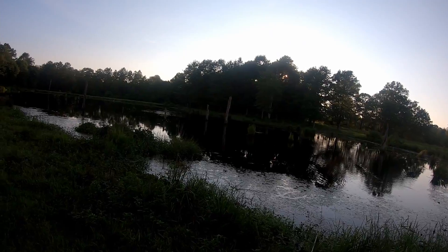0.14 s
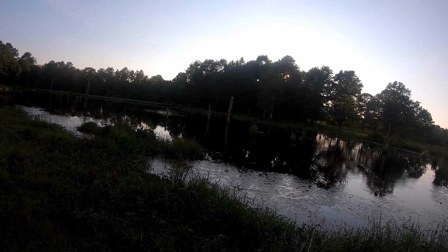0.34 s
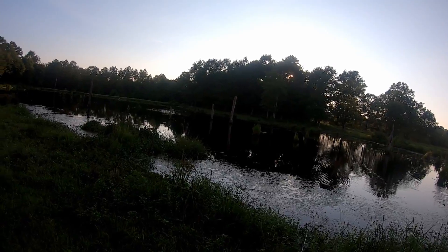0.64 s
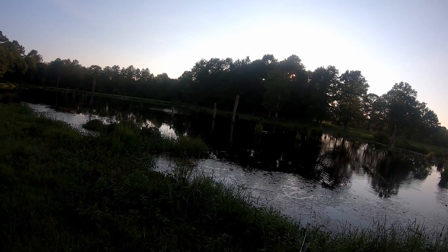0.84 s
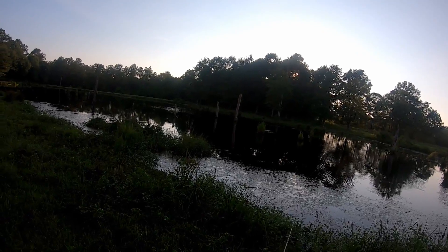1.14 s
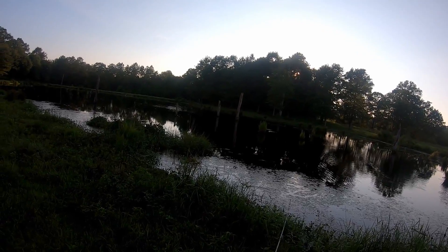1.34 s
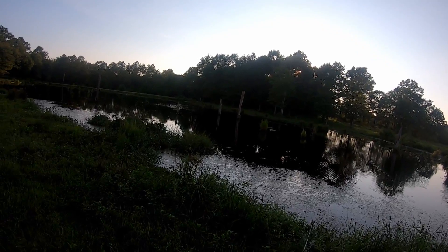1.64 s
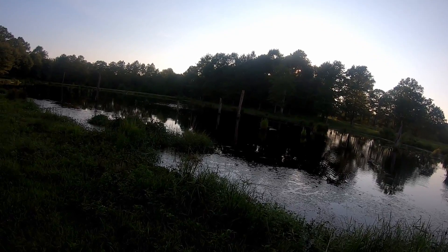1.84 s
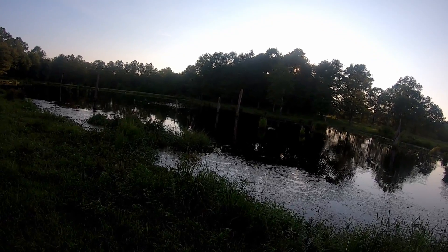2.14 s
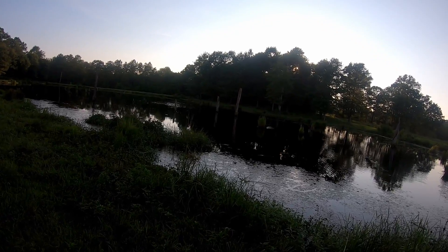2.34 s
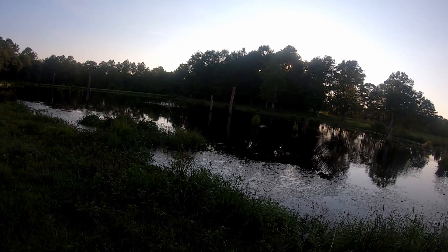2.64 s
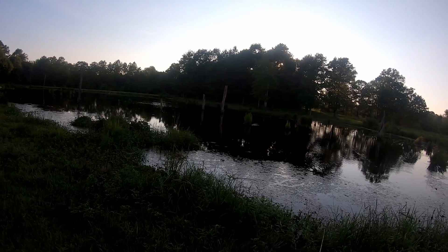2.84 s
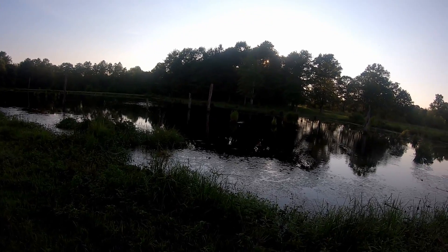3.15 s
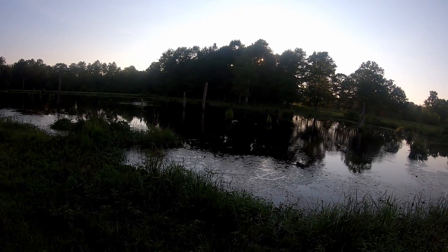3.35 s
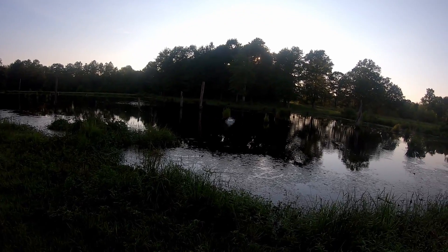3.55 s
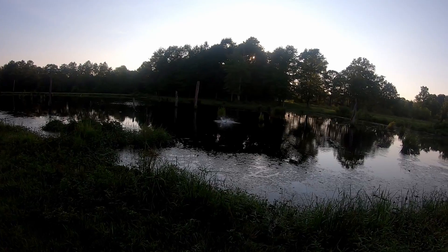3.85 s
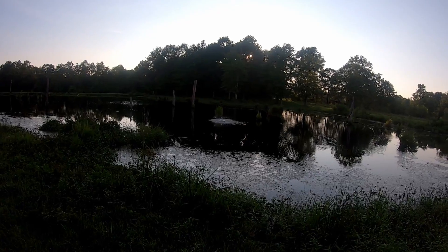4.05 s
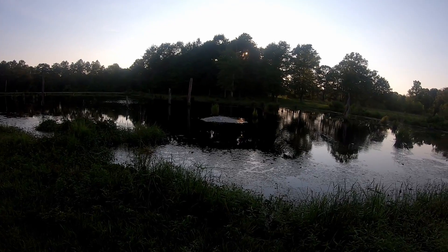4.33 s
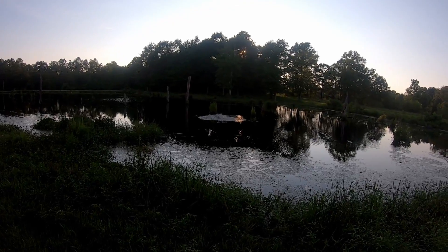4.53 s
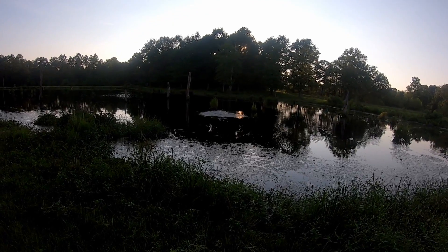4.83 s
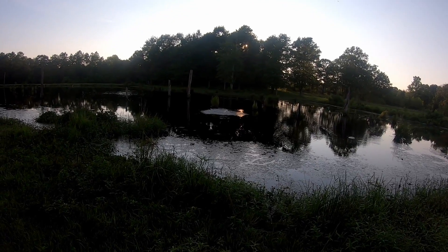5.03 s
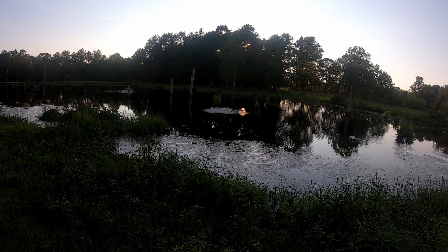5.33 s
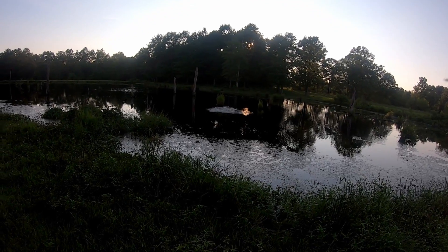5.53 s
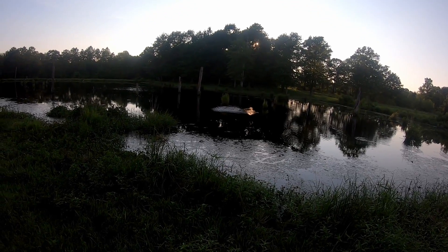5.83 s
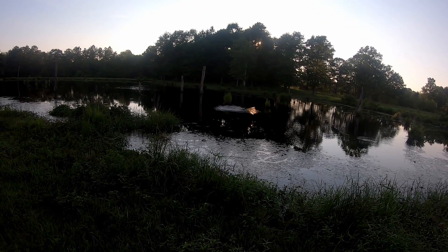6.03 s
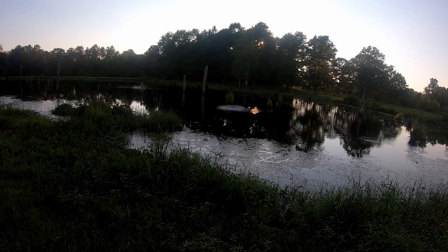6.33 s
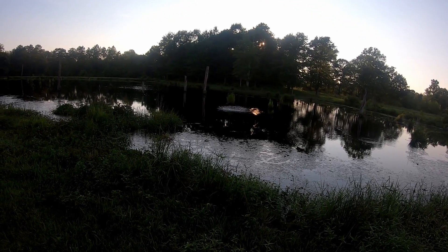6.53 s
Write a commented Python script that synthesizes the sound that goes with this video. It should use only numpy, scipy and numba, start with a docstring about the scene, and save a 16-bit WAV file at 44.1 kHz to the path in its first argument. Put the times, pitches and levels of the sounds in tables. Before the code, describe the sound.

A fishing reel clicks and winds with an uneven, raspy whir after nearby rod knocks and rustling, over soft insects, water and distant birds.

```python
"""Dusk at a pond, a two-port stereo microphone beside an angler. From the start: crickets, buzzing
insects, small splashes at the bank and a low distant hum; far birds whistle and far frogs call.
A few snaps come from the reel. At 3 s, close up, the angler shifts the rod and snaps the reel shut:
hands thump, cloth rustles, a sleeve swishes, the rod knocks, while a deeper hum swells in. From about
4 s the angler winds in, the line rubbing by the right port, and for a while the rotor ticks."""
import sys
import numpy as np
from scipy import signal
from scipy.io import wavfile
from numba import njit

SR = 44100
rng = np.random.default_rng(int(sys.argv[2]) if len(sys.argv) > 2 else 0)


def generate_wav(signal):
    """Clip the signal to [-1, 1] and save it as 16-bit WAV at the path in sys.argv[1]."""
    frames = np.transpose(np.atleast_2d(signal))
    scaled = np.clip(frames, -1, 1) * 32767
    pcm = np.round(scaled).astype(np.int16)
    wavfile.write(sys.argv[1], SR, pcm)


N = 294588

# how alike the two ports hear broad noise: f/Hz, correlation
PORT_LIKENESS = [(60, 1), (170, 0.9), (400, 0.58), (700, 0.36), (1400, 0.17), (3000, 0.53), (5000, 0.37),
                 (7000, -0.76), (9500, 0.056), (12500, 0.12)]
# far air: f/Hz, relative density/dB
AIR_SPECTRUM = [(230, -7), (340, 0.5), (560, -36), (830, -3.5), (1300, -0.5), (1850, -5), (2850, -7.5),
                (4840, -9), (6500, 0), (7500, -32)]
# distant hum: f/Hz, width/Hz, relative level/dB
HUM_MODES = [(143, 45, -2.5), (172.7, 24.6, 1.5), (224.3, 24.7, -4)]
# insects round the pond: t/s, crickets/dB, buzz/dB, high hiss/dB
INSECT_LEVELS = [(0, -59, -62.5, -58.5), (1.0, -59.5, -60, -57), (2.98, -60, -59.5, -57),
                 (3.18, -60, -65, -58), (3.9, -58, -65, -58.5), (4.4, -61, -66, -64),
                 (5.1, -57.5, -63, -59.5), (5.88, -59.5, -65, -61.5), (6.25, -59, -62, -58),
                 (6.68, -58.5, -64, -59)]
# bands of the crickets and of the buzz: f/Hz, width/Hz, relative level/dB
CRICKET_MODES = [(6913, 210, 1.5), (7260, 450, 0.5)]
BUZZ_MODES = [(9860, 490, 2), (10820, 730, 1.5), (11000, 300, -6.5)]
# high insect hiss: f/Hz, relative density/dB
HISS_SPECTRUM = [(6700, -34), (7700, 7), (8300, 8.5), (9000, -4), (11500, -1.5), (12600, -15.5), (13500, 0),
                 (14200, -4), (15000, -10), (17000, -19)]
# water at the bank: t/s, level/dB
BANK_LEVELS = [(0, -57.5), (.4, -62), (.8, -61), (1.5, -63), (1.9, -59.5), (2.74, -61.5), (2.79, -88),
               (2.97, -62), (3.1, -55.5), (6.68, -58.5)]
# lapping under the bubbles: f/Hz, relative density/dB
WASH_SPECTRUM = [(600, -7), (1000, 1), (1900, 0.5), (2600, -1.5), (3600, -8), (5000, -19)]
# the clearest drips: t/s, starting f/Hz, level/dB
CLEAR_DRIPS = [(0.189, 754, -63), (1.129, 696, -56.5), (1.201, 815, -62), (1.4, 760, -55),
               (1.469, 650, -68), (1.685, 694, -54), (1.749, 890, -65), (1.901, 827, -57),
               (1.941, 3170, -59), (1.99, 2160, -54), (2.099, 726, -53), (2.167, 760, -53.5),
               (2.22, 3140, -58), (2.32, 1265, -53.5), (2.45, 677, -57), (2.5, 2700, -55),
               (2.54, 623, -53.5)]
# two far birds, one falling whistle each: t/s into the call, f/Hz, relative level/dB
LOW_WHISTLE = [(0, 3440, -10), (.045, 3310, -2.5), (.068, 2950, -6), (.088, 2420, -6), (.11, 2270, -10)]
HIGH_WHISTLE = [(0, 7050, -12), (.025, 6250, 1.5), (.05, 5450, -4), (.08, 4900, -5), (.12, 4600, -14)]
# their calls: t/s, level/dB
LOW_BIRD_CALLS = [(0.016, -54), (0.656, -52.5), (.915, -51), (3.305, -57)]
HIGH_BIRD_CALLS = [(.18, -59), (1.867, -61), (5.144, -55.5), (6.519, -69)]
# short bird chips: t/s, length/s, first f/Hz, last f/Hz, level/dB
BIRD_CHIPS = [(4.663, 0.022, 3920, 3230, -43.5), (4.711, 0.027, 4250, 4520, -48),
              (5.71, .03, 3900, 4360, -53), (6.609, .04, 4200, 5000, -46.5)]
# far frogs: t/s, length/s, first f/Hz, last f/Hz, level/dB
FROG_CALLS = [(0.087, 0.06, 2000, 1980, -58.5), (.64, 0.061, 1850, 1910, -61),
              (0.96, 0.063, 1007, 1046, -65.5), (1.04, 0.13, 2850, 2740, -67),
              (1.226, 0.054, 2700, 2680, -64.5), (1.28, 0.12, 1056, 1007, -67),
              (1.55, 0.045, 1330, 1290, -64), (1.733, 0.03, 2520, 2100, -59),
              (1.906, 0.024, 2700, 2280, -58), (2.011, 0.031, 2470, 2040, -60),
              (2.18, 0.19, 1343, 1290, -66), (2.236, 0.035, 2370, 2200, -61), (2.257, .03, 2310, 2940, -64),
              (2.287, 0.024, 2570, 2080, -57), (2.433, 0.035, 2770, 2380, -64.5),
              (2.456, 0.05, 1400, 1304, -60), (2.523, 0.013, 2610, 2250, -57.5),
              (2.566, .025, 2770, 2150, -57), (2.588, 0.019, 2230, 2600, -57),
              (2.902, 0.032, 2570, 2280, -60)]
# hands on the casing, and cloth close by: peak t/s, 10 dB rise/s, 10 dB fall/s, level/dB
HAND_BUMPS = [(.15, .04, .04, -69), (.67, .05, .15, -71), (2.27, .08, .04, -76), (2.63, 0.12, 0.037, -67),
              (3.09, 0.045, 0.075, -46), (3.26, 0.11, 0.064, -47), (3.77, 0.19, 0.083, -52),
              (3.9, 0.072, 0.26, -56.5), (4.28, 0.16, 0.062, -57.5), (4.68, 0.09, .04, -53),
              (4.87, .06, 0.18, -58.5), (5.36, .08, 0.15, -52), (5.95, 0.12, 0.16, -56.5),
              (6.5, 0.13, .1, -67)]
CLOTH_RUSTLES = [(.48, 0.06, .1, -62.5), (.68, 0.084, 0.07, -56.5), (3.08, .06, 0.15, -49.5),
                 (3.225, 0.051, .05, -44.5), (3.272, .03, 0.05, -36), (3.385, .05, 0.044, -47.5),
                 (3.54, 0.067, 0.035, -45.5), (3.68, 0.15, 0.079, -42), (3.83, .06, 0.064, -50),
                 (3.98, 0.14, .2, -57.5), (4.17, 0.093, 0.073, -50.5), (4.3, 0.046, 0.073, -49.5),
                 (4.385, .05, 0.017, -50), (4.8, 0.16, .12, -62.5), (5.33, 0.099, 0.12, -61),
                 (5.55, 0.36, .15, -59.5), (6.5, .1, 0.042, -58), (6.68, 0.073, 0.067, -60.5)]
# cloth: f/Hz, relative density/dB
CLOTH_SPECTRUM = [(110, -12), (190, -6.5), (270, -2.5), (380, -2), (480, -1.5), (800, -2.5), (1400, -7),
                  (3000, -41), (5000, -25)]
# bright snaps of the reel: t/s, level/dB, ring f/Hz, t60/s, left over right/dB
REEL_SNAPS = [(0.234, -41, 7040, 0.11, 3), (0.5778, -33, 2280, 0.053, 3), (1.5096, -49, 7000, 0.052, -6),
              (2.569, -45, 2650, 0.089, -3), (2.5987, -46, 2210, 0.11, -5), (2.898, -49, 2290, 0.034, -1.5),
              (3.13, -35, 3440, 0.04, 0), (3.336, -49, 3340, 0.037, -1.5), (3.47, -34.5, 3600, 0.075, 15),
              (3.577, -39, 2980, 0.044, -1.0), (3.635, -36, 3220, 0.067, 2),
              (3.716, -43, 2350, 0.035, -0.5), (3.744, -42, 2550, 0.073, 1.0),
              (3.8313, -27.5, 6500, 0.014, -2), (3.9789, -32.5, 2510, 0.044, 3),
              (4.019, -34.5, 4300, 0.034, 1), (4.1516, -38.5, 2520, 0.029, 1), (5.197, -44, 4000, .03, 2),
              (5.443, -43, 3600, .03, 3)]
# the deeper hum: t/s, level/dB
DEEP_HUM_LEVELS = [(0, -91), (3.0, -75), (4.0, -67.5), (6.68, -64)]
# sleeve close by: peak t/s, 10 dB rise/s, 10 dB fall/s, level/dB
SLEEVE_SWISHES = [(3.08, 0.028, 0.055, -49), (3.134, 0.0075, .03, -44), (3.474, 0.004, 0.0076, -39),
                  (3.575, 0.034, .02, -45.5), (3.65, 0.063, 0.17, -41.5), (3.82, 0.02, 0.013, -42),
                  (3.935, 0.09, 0.031, -44), (4.02, 0.048, 0.095, -44)]
# sleeve: f/Hz, relative density/dB
SLEEVE_SPECTRUM = [(700, -9), (1200, 0.5), (2200, 0.5), (3500, -1), (5000, -9), (7000, -20)]
# dull knocks through rod and casing: t/s, level/dB, ring f/Hz, t60/s
ROD_KNOCKS = [(3.082, -40, 346, 0.047), (3.23, -33.5, 455, .04), (3.2675, -17.5, 815, 0.0062),
              (3.272, -28, 348, 0.058), (3.286, -30, 720, 0.018), (3.324, -36, 403, 0.041),
              (3.491, -24.5, 723, 0.018), (3.532, -35, 592, 0.021), (3.593, -32.5, 470, 0.047),
              (3.898, -40, 1000, 0.02), (4.151, -30, 990, 0.017), (4.369, -42, 222, 0.14),
              (6.515, -43.5, 460, 0.035)]
# winding strokes: top-speed t/s, 10 dB rise/s, 10 dB fall/s, level/dB, top-speed f/Hz
WINDING_STROKES = [(3.91, 0.044, 0.076, -44.5, 2250), (4.065, 0.047, 0.034, -44.5, 2400),
                   (4.21, 0.061, 0.12, -42, 2570), (4.31, 0.046, 0.088, -42.5, 2340),
                   (4.49, 0.075, 0.045, -43.5, 2350), (4.555, 0.089, 0.086, -48.5, 2700),
                   (4.62, 0.044, 0.055, -43, 1950), (4.71, 0.055, 0.067, -44, 2210),
                   (4.8, 0.1, 0.15, -45.5, 2320), (4.969, 0.039, 0.031, -42, 2260),
                   (5.055, 0.081, 0.077, -39.5, 3000), (5.26, 0.059, 0.072, -41.5, 2760),
                   (5.372, 0.027, 0.026, -39, 2970), (5.511, 0.054, 0.049, -43, 2810),
                   (5.58, 0.056, .1, -42, 2970), (5.79, 0.094, 0.052, -47.5, 1920),
                   (5.85, 0.046, 0.051, -44, 2600), (5.965, .025, 0.027, -40.5, 2520),
                   (6.101, 0.069, 0.11, -45, 2030), (6.2, 0.065, 0.078, -45, 2010),
                   (6.31, 0.048, 0.043, -48, 1920), (6.47, 0.074, 0.051, -50.5, 1850),
                   (6.575, 0.12, 0.094, -50, 2520), (6.67, 0.049, .05, -46.5, 2000)]
# lower and higher rings of reel and rod: f/Hz, width/Hz, relative level/dB
REEL_MODES = [(1504, 360, -8.5), (1723, 34, -1), (1763, 21, 4), (1984, 86, 6), (2266, 79, -1),
              (2450, 40, 7.5), (2540, 150, -1.5), (2720, 74, 4), (2930, 62, 4), (3230, 65, 4.5),
              (3700, 60, 1.5)]
BRIGHT_MODES = [(4050, 590, 0), (5180, 290, 4.5), (6500, 140, -18), (6190, 50, -6), (6420, 1260, 1),
                (8100, 440, 5.5), (9130, 1200, 4), (10020, 490, 6.5)]
# ticks of the rotor: t/s, level/dB
ROTOR_TICKS = [(4.2981, -51), (4.362, -42.5), (4.4273, -50), (4.4864, -50), (4.5545, -48), (4.6169, -49),
               (4.6753, -50), (4.7434, -51), (4.8044, -47), (4.8663, -48), (4.9344, -42), (5.0034, -46),
               (5.08, -46), (5.1482, -52), (5.2096, -47), (5.2764, -45), (5.3394, -51), (5.4051, -48),
               (5.4839, -47), (5.5653, -44), (5.6304, -48), (5.7029, -49), (5.8007, -48)]

BLOW_T = np.arange(int(.12 * SR)) / SR   # time axis of a snap, knock or tick, t/s
STEP = 40   # samples between points of a slow curve


def from_db(db):
    """Decibels to gain."""
    return 10 ** (np.asarray(db) / 20)


def rms_one(x):
    """Scale to rms 1."""
    return x / np.sqrt(np.mean(x ** 2) + 1e-20)


def butter(x, order, hz, kind):
    """Pass a low, high or middle band."""
    return signal.sosfilt(signal.butter(order, hz, kind, fs=SR, output="sos"), x)


def in_time(rows):
    """Every column joined by straight lines, one value a sample."""
    s, *columns = np.transpose(rows)
    return [np.interp(np.arange(N) / SR, s, c) for c in columns]


def at_hz(points, hz):
    """Read a spectrum on a log axis."""
    freqs, values = np.transpose(points)
    return np.interp(np.log(hz), np.log(freqs), values)


def every_sample(slow):
    """Fill in a slow curve."""
    return np.interp(np.arange(N) / STEP, np.arange(len(slow)), slow)


def drift(rate_hz):
    """Slow random wander of spread 1."""
    r = np.exp(-2 * np.pi * rate_hz * STEP / SR)
    slow = signal.lfilter([1], [1, -2 * r, r * r], rng.standard_normal(N // STEP + 2002))[2000:]
    return every_sample(rms_one(slow))


def fades(rows, roundness=0.93):
    """Slow curves of how many tens of dB each event lies under its peak."""
    s, rise, fall = np.transpose(rows)[:3, :, None]
    late = np.arange(0, N + STEP, STEP) / SR - s
    return np.abs(np.where(late < 0, late / rise, late / fall)) ** roundness


def swells(rows, still_db):
    """Gain of events that swell and fade over a still level; powers add."""
    gains = from_db(np.transpose(rows)[3, :, None] - 10 * fades(rows))
    return every_sample(np.sqrt(from_db(2 * still_db) + np.sum(gains ** 2, axis=0)))


def resonate(x, hz, width):
    """A resonance with gain 1 at its peak."""
    r = np.exp(-np.pi * width / SR)
    poles = [1, -2 * r * np.cos(2 * np.pi * hz / SR), r * r]
    return signal.lfilter(np.array([1, 0, -1]) * (1 - r * r) / 2, poles, x)


def modes(x, table):
    """Resonances side by side with alternating signs; rms 1."""
    rings = (from_db(db) * resonate(x, hz, width) for hz, width, db in table)
    return rms_one(sum((-1) ** k * ring for k, ring in enumerate(rings)))


@njit
def sliding(x, hz, width):
    """A resonance whose centre moves from sample to sample."""
    out, r = np.zeros_like(x), np.exp(-np.pi * width / SR)
    for i in range(2, len(x)):
        feedback = 2 * r * np.cos(2 * np.pi * hz[i] / SR) * out[i - 1] - r * r * out[i - 2]
        out[i] = x[i] - x[i - 2] + feedback
    return out


def noise():
    """Two unrelated stereo noises."""
    return rng.standard_normal((2, 2, N))


def banded(spectrum, white, flicker_db):
    """Third-octave bands of stereo noise, each with its own level, flicker and likeness; mid rms 1."""
    out, together = 0, drift(19.8)
    bottom, top = spectrum[0][0], spectrum[-1][0]
    edges = bottom * 2 ** np.arange(0, np.log2(top / bottom), 1 / 3)
    for k, (low, high) in enumerate(zip(edges, edges[1:])):
        mid, side = butter(white[k % 2], 2, [low, min(high, .45 * SR)], "band")
        hz = np.sqrt(low * high)
        alike = at_hz(PORT_LIKENESS, hz)
        gain = from_db(at_hz(spectrum, hz) + flicker_db * (0.94 * together + drift(16.7)))
        out = out + gain * (np.sqrt(1 + alike) * mid + np.sqrt(1 - alike) * side * [[1], [-1]])
    return out / np.sqrt(np.mean(out.mean(axis=0) ** 2))


def ports(mid, side, side_db):
    """Left and right port from mid and side."""
    return mid + from_db(side_db) * side * np.array([[1], [-1]])


def add(out, s, sound, pan_db):
    """Lay a short sound into the stereo track; positive pan is left."""
    i = round(s * SR)
    out[:, i:i + len(sound)] += sound[:N - i] * from_db([[pan_db / 2], [-pan_db / 2]])


def far_air():
    """Faint broad noise from far off, nearly steady."""
    return from_db(-67) * banded(AIR_SPECTRUM, noise(), flicker_db=0.54)


def distant_hum():
    """A drone of noise in three low resonances, near the centre."""
    low = butter(rng.standard_normal((2, N)), 3, [120, 250], "band")
    return from_db(-62) * ports(*modes(low, HUM_MODES), side_db=-8.0)


def insects():
    """Many crickets blur to a narrow throbbing band; the buzz pulses about sixty times a second."""
    cricket_db, buzz_db, hiss_db = in_time(INSECT_LEVELS)
    white = noise()
    crickets = ports(*modes(modes(white[0], CRICKET_MODES), [(7055, 330, 0)]), side_db=0.83)
    beat = 2 * np.pi * np.cumsum(61 + 1.09 * drift(0.47)) / SR
    pulses = 1 + 0.29 * np.cos(beat) + 0.19 * np.cos(3 * beat)
    buzz = ports(*modes(modes(white[1], BUZZ_MODES), [(10300, 920, 0)]), side_db=0.7)
    throb_db = 1.6 * drift(8.0)
    hiss = from_db(hiss_db) * banded(HISS_SPECTRUM, white[::-1], flicker_db=0.63)
    return from_db(cricket_db + throb_db) * crickets + from_db(buzz_db) * pulses * buzz + hiss


def bubble(hz, rise):
    """A bubble rings briefly while its pitch climbs."""
    cycles = np.arange(int(22 * SR / hz)) * hz / SR
    return np.sin(np.pi * cycles / 22) * np.sin(2 * np.pi * cycles * (1 + rise * cycles))


def splashes(count=900):
    """At the bank, a little to the right: small bubbles patter on a lapping wash, clear drips on top."""
    patter, drips = np.zeros((2, 2, N))
    for when, pitch, size, pan in rng.random((count, 4)):
        pop = bubble(700 * 4.0 ** pitch, rise=0.0143) * from_db(4.7 * size + 5.0 * pitch)
        add(patter, when * (N - 1) / SR, pop, pan_db=10 * (pan - .7))
    for s, hz, db in CLEAR_DRIPS:
        drip = bubble(hz, rise=35.0 / (hz + 150))   # big drips climb furthest
        add(drips, s - 5.3 / hz, from_db(db) * drip, pan_db=-2.0)
    wash = banded(WASH_SPECTRUM, noise(), flicker_db=2.27) * from_db([[-1.5], [1.5]])
    return from_db(*in_time(BANK_LEVELS)) * (0.43 * rms_one(patter) + 1.063 * wash) + drips


def birds():
    """Far near-sine whistles with soft ends, roughened and smeared by the trees."""
    out = np.zeros((2, N))
    calls = [(s, db, LOW_WHISTLE) for s, db in LOW_BIRD_CALLS]
    calls += [(s, db, HIGH_WHISTLE) for s, db in HIGH_BIRD_CALLS]
    for s, length, first_hz, last_hz, db in BIRD_CHIPS:
        chip = [(0, first_hz, -12), (length / 2, (first_hz + last_hz) / 2, 0), (length, last_hz, -15)]
        calls.append((s, db, chip))
    for start, call_db, shape in calls:
        s, hz, db = np.transpose(shape)
        t = np.arange(0, s[-1], 1 / SR)
        ends = np.clip(np.minimum(t, s[-1] - t) / 0.002, 0, 1)
        tone = np.sin(2 * np.pi * np.cumsum(np.interp(t, s, hz)) / SR)
        add(out, start, ends * from_db(call_db + np.interp(t, s, db)) * tone, pan_db=0)
    for lag_s, db in [(.006, -10), (.015, -14)]:   # echoes off the trees
        lag = int(lag_s * SR)
        out[:, lag:] += from_db(db) * out[::-1, :-lag]
    return out * from_db(4.0 * drift(80.0))


def frogs():
    """Far off, right of centre: each call is a sliding tone, rough from its uneven pulses."""
    out, rough = np.zeros((2, N)), from_db(4.5 * drift(90.0))
    for s, length, first_hz, last_hz, db in FROG_CALLS:
        t = np.arange(int(length * SR)) / SR
        hz = first_hz + (last_hz - first_hz) * t / length
        call = np.sqrt(2) * np.sin(2 * np.pi * np.cumsum(hz) / SR)
        add(out, s, from_db(db) * call * np.sqrt(np.sin(np.pi * t / length)), pan_db=-3.0)
    return out * rough


def handling():
    """Hands on the casing: rumble pushes the two ports in opposite senses, most at the lowest pitches."""
    white = rng.standard_normal((2, N))
    mid = rms_one(butter(white[0], 2, [15, 130], "band"))
    side = rms_one(butter(white[1] + 0.5 * white[0], 3, [15, 50], "band"))
    return swells(HAND_BUMPS, still_db=-80.5) * ports(mid, side, side_db=4.8)


def cloth():
    """Cloth rustles by the microphone in swells of patchy noise."""
    return swells(CLOTH_RUSTLES, still_db=-72.5) * banded(CLOTH_SPECTRUM, noise(), flicker_db=3.9)


def decay(t60):
    """The gain of a blow, down 60 dB after t60 seconds."""
    return from_db(-60 * BLOW_T / t60)


def reel_snaps():
    """The reel snaps close by: a dying burst of noise, part of it through a ring."""
    out = np.zeros((2, N))
    for s, db, hz, t60, pan_db in REEL_SNAPS:
        burst = rng.standard_normal(len(BLOW_T)) * decay(t60)
        snap = butter(burst, 3, [1800, 7500], "band") + 3.2 * resonate(burst, hz, width=360)
        add(out, s, from_db(db) * snap / np.abs(snap).max(), pan_db)
    return out


def deep_hum():
    """A deeper, narrow band of noise swells in, the same at both ports."""
    hum = rms_one(resonate(rng.standard_normal(N), hz=104.5, width=19))
    return from_db(*in_time(DEEP_HUM_LEVELS)) * hum


def sleeve():
    """Lumpy, crackling broad noise while the arm moves beside the microphone."""
    lumps = from_db(3.8 * drift(150.0) + 1.5 * drift(30.0))
    swish = banded(SLEEVE_SPECTRUM, noise() * lumps, flicker_db=2.4)
    return swells(SLEEVE_SWISHES, still_db=-120) * swish


def rod_knocks():
    """Knocks through rod and casing: a dull ring whose weak overtone dies twice as fast."""
    out = np.zeros((2, N))
    for s, db, hz, t60 in ROD_KNOCKS:
        phase = 2 * np.pi * hz * BLOW_T
        ring = -np.sin(phase) - 0.09 * np.sin(2.3 * phase) * decay(t60)
        add(out, s, from_db(db) * butter(ring * decay(t60), 2, 140, "high"), pan_db=-1.0)
    return out


def strokes(rest_hz=1000, slowing_db=6.5):
    """Level and pitch of the rub: each stroke speeds up and slows, and the louder one sets the pitch."""
    fade = fades(WINDING_STROKES, roundness=1.65)
    peak_db, top_hz = np.transpose(WINDING_STROKES)[3:, :, None]
    power = from_db(2 * np.maximum(peak_db - 10 * fade, -200))
    pitch = rest_hz + (top_hz - rest_hz) * from_db(-slowing_db * fade)
    total = power.sum(axis=0)
    return every_sample(10 * np.log10(total)), every_sample((power * pitch).sum(axis=0) / total)


def winding():
    """Grainy friction, pitched by the speed of the stroke, sounds through the rings of reel and rod."""
    rub_db, stroke_hz = strokes()
    grains = rng.standard_normal((2, N)) * from_db(0.58 * drift(130.0) + 1.53 * drift(35.0))
    sung = np.array([rms_one(sliding(sliding(g, stroke_hz, 450.0), stroke_hz, 740.0)) for g in grains])
    # coarser ridges sing lower
    under = np.array([rms_one(sliding(g, 0.717 * stroke_hz, 270.0)) for g in grains])
    friction = sung + .5 * under + 0.8 * rms_one(resonate(grains, hz=2100, width=980))
    near, other = rms_one(modes(friction, REEL_MODES) + 0.59 * rms_one(friction))
    # the source is by the right port; the left hears it weak and mostly inverted
    rub = np.array([-.4 * near + 0.28 * other, 2.15 * near])
    overtone = rms_one(sliding(grains[0], 2 * stroke_hz, 280.0))
    near, other = butter(modes(grains[::-1] + 0.18 * overtone, BRIGHT_MODES), 6, 10800, "low")
    bright = np.array([-.5 * near + 1.22 * other, 2.87 * near])
    # the higher rings grow with the level and the pitch of the rub
    bright_db = -56.5 + 0.46 * (rub_db + 44) + 9.5 * np.log2(stroke_hz / 2200)
    return from_db(rub_db) * rub + from_db(bright_db) * bright


def rotor_ticks():
    """The rotor ticks close on the right: short bursts of noise, top treble only."""
    out = np.zeros((2, N))
    for s, db in ROTOR_TICKS:
        tick = butter(rng.standard_normal(len(BLOW_T)) * decay(t60=.06), 4, 11000, "high")
        add(out, s, from_db(db) * tick / np.abs(tick).max(), pan_db=-5.0)
    return out


def scene():
    """The pond all round and the angler close by, summed at the microphone."""
    pond = far_air() + distant_hum() + deep_hum() + splashes() + insects() + frogs() + birds()
    tackle = reel_snaps() + rod_knocks() + rotor_ticks() + winding()
    return pond + tackle + handling() + cloth() + sleeve()


def record(dry, cutoff_hz=15760):
    """The top is cut steeply."""
    return signal.sosfilt(signal.ellip(14, .5, 70, cutoff_hz, fs=SR, output="sos"), dry)


dry = scene()
out = record(dry)
generate_wav(out)
```